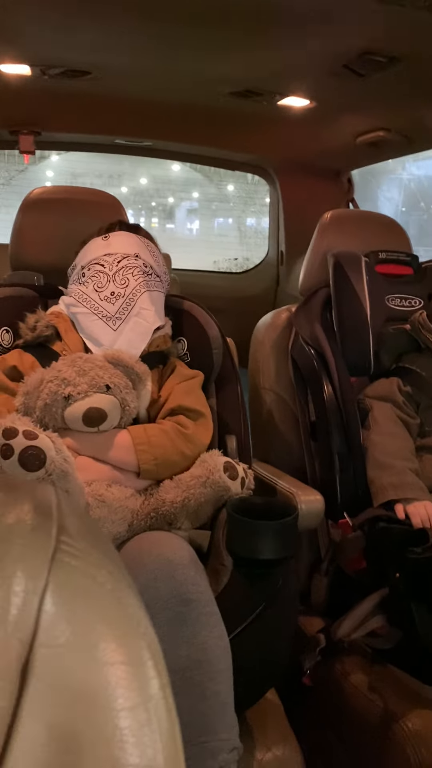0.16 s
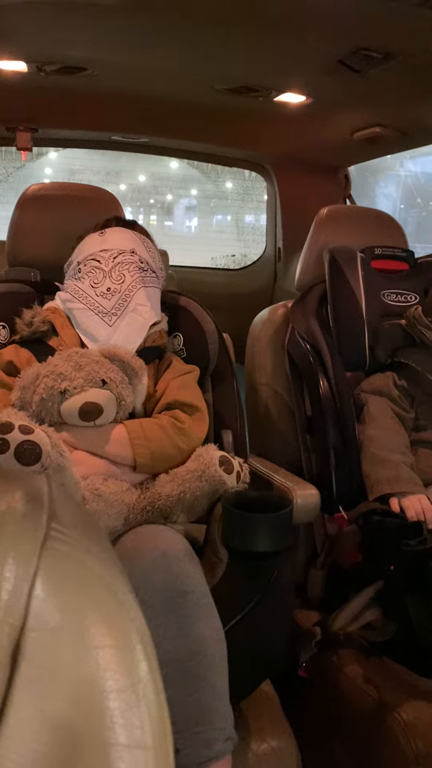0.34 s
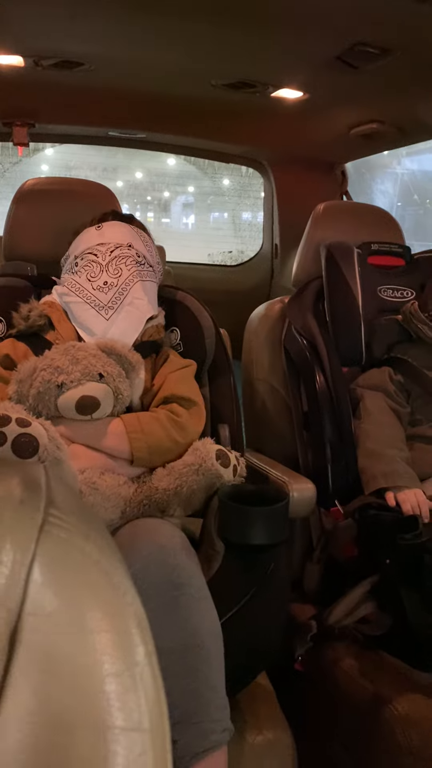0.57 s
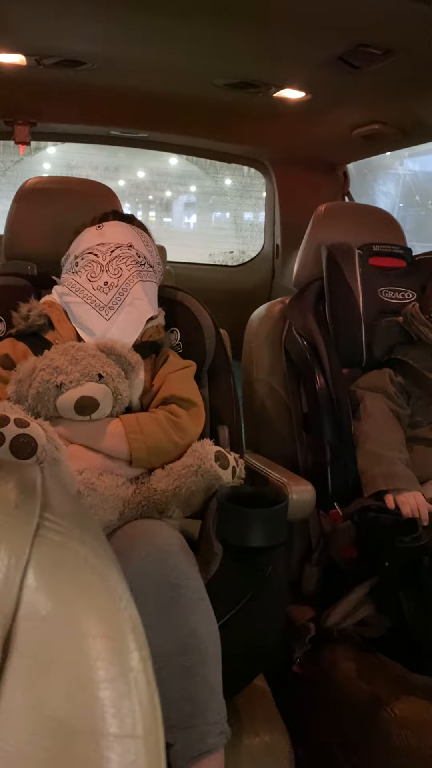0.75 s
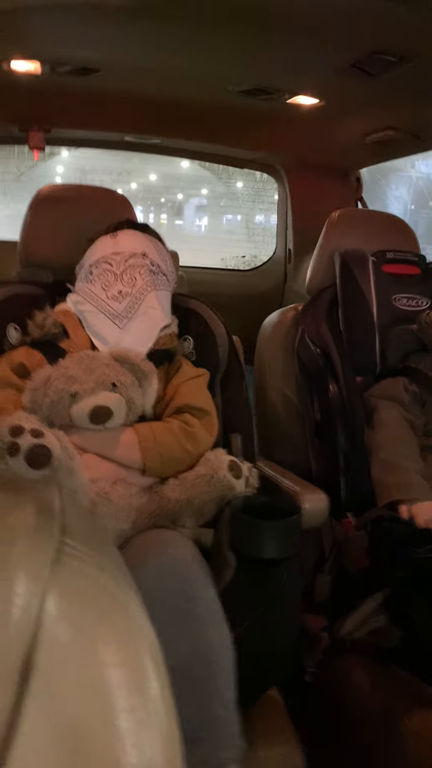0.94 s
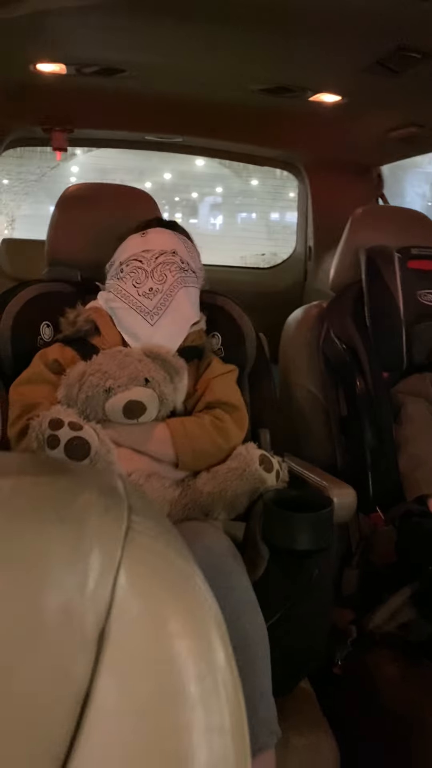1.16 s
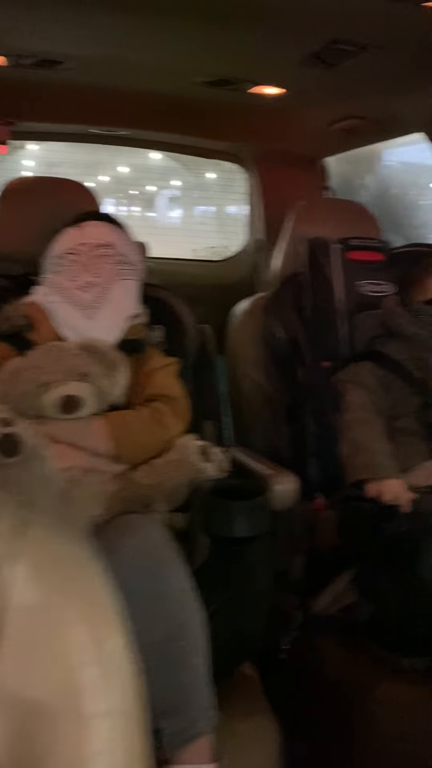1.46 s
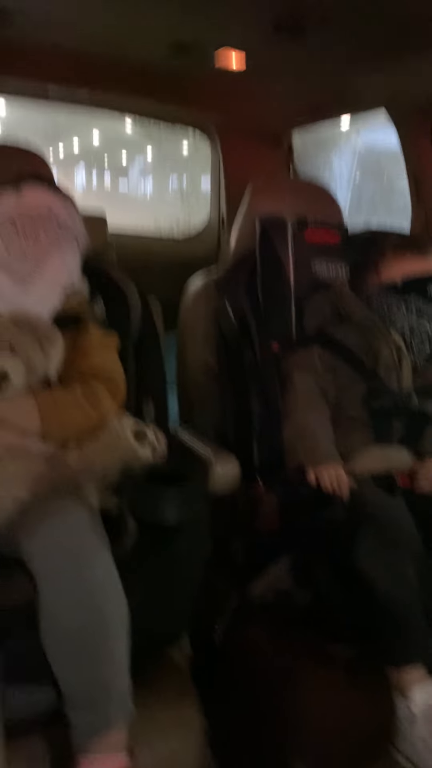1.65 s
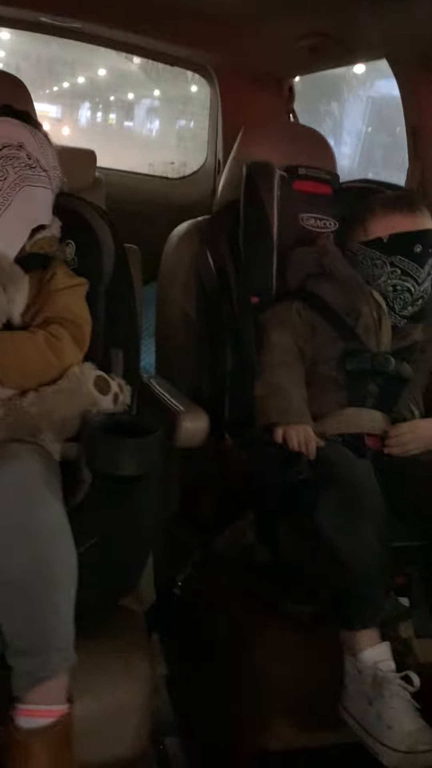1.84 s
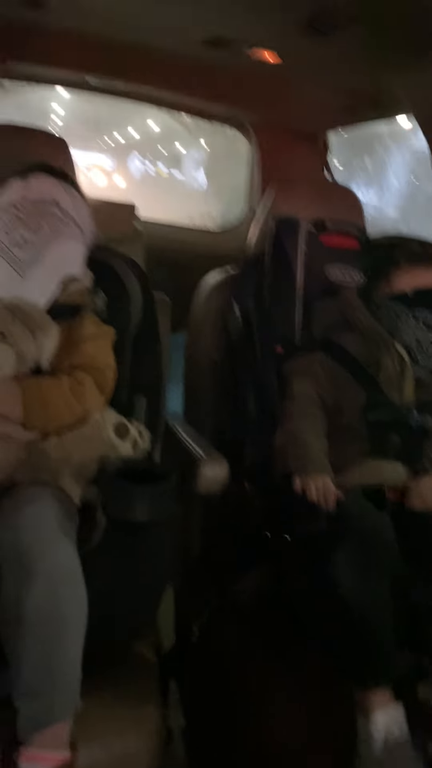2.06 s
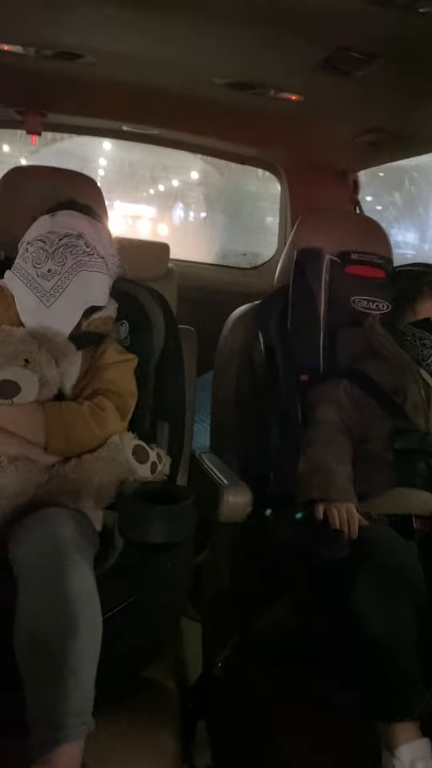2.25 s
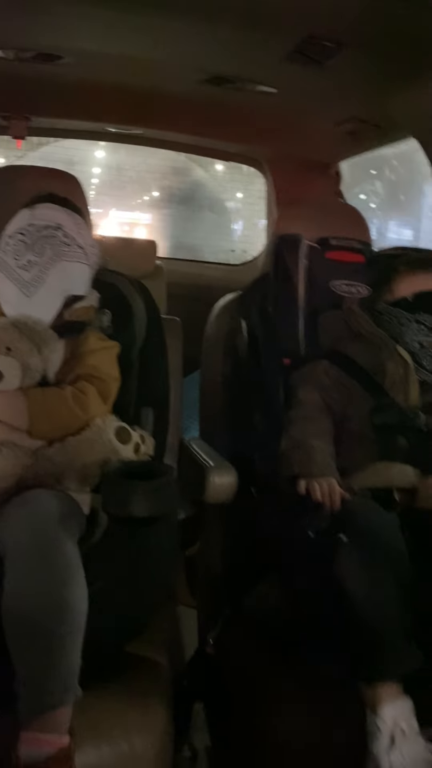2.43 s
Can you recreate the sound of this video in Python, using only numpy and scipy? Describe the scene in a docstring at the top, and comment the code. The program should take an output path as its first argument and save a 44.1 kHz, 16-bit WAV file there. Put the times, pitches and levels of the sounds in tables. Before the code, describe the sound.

A van door slams almost at once, with a metallic crunch, latch snap and deep cabin boom; low engine rumble continues, then a lighter hollow knock bounces and settles. Close stereo microphone inside the parked vehicle.

```python
"""Van door slam, engine idling

From the front seat of a parked van: the door seal meets the frame, the panel hits and the latch snaps.
Contacts are sharp clicks with decaying noise and ringing modes; soft pushes make the cabin air boom.
Later a lighter knock on the trim bounces and settles, among low thuds, ticks, sliding cloth and a squeak.
Engine tones, rumble and hiss lie beneath, with outside noise until the door seals.
A microphone with two ports that differ in phase picks it all up."""
import sys
import numpy as np
from scipy import signal
from scipy.fft import rfft, irfft
from scipy.io import wavfile
from scipy.ndimage import uniform_filter1d, minimum_filter1d

SR = 44100
rng = np.random.default_rng(int(sys.argv[2]) if len(sys.argv) > 2 else 0)


def transcribe(u):
    """Save the signal u as a 16-bit wav file named by the first command-line argument.

    u: samples, shape (n,) or (channels, n), limited to [-1, 1]; the rate is SR.
    q: integer samples, one column per channel.
    """
    v = np.clip(np.atleast_2d(u).T, -1, 1)
    q = np.round(v * 32767).astype(np.int16)
    wavfile.write(sys.argv[1], SR, q)


N = 114660
TIME = np.arange(N) / SR
LOW_CUT_HZ = 32.8  # for the cabin boom and the rumble

# Door meets frame [t/s, level/dB, attack/s]
DOOR_CONTACTS = [(.230, -19.5, 0.0054), (.239, -11.5, .002), (.246, -11.5, 0.0011), (.250, -16.5, 0.00089),
                 (.301, -21, 0.0016)]
# Panel noise colour [f/Hz, level per Hz/dB] and decay [f/Hz, t60/s]
DOOR_SPECTRUM = [(30, -49), (80, 12), (150, 4.5), (300, -3), (450, 0.5), (700, -4), (1100, -13),
                 (2200, -16), (5000, -29.5), (9000, -40), (16000, -47.5)]
DOOR_DECAY = [(100, 0.4), (250, 0.38), (700, 0.19), (2000, 0.2), (6000, .24), (14000, 0.37)]
# Sheet metal modes [f/Hz, level/dB, t60/s]
PANEL_MODES = [(187, -17.5, 0.24), (322.5, -14, 0.36), (441.6, -9, 0.28), (462, -22.5, 0.24),
               (596, -13.5, .16), (669, -18.5, .12), (787, -18, 0.087)]
# Short, hard crunch as the door bottoms out [t/s, level/dB, attack/s]
CRUNCH_CONTACTS = [(.2415, -16, 0.001965), (.2465, -9, 0.002976)]
# Crunch colour [f/Hz, level per Hz/dB] and decay [f/Hz, t60/s]
CRUNCH_SPECTRUM = [(330, -30.5), (590, 0), (950, -4.5), (1500, -9.5), (2700, -15.5), (12000, -56.5)]
CRUNCH_DECAY = [(600, 0.02), (2500, .035)]
# Latch parts striking [t/s, level/dB, attack/s, pitch f/Hz]
LATCH_CONTACTS = [(.240, -29, 0.0013, 2430), (.246, -22, 0.00086, 1660), (.2735, -19, .001, 5470),
                  (.277, -19.5, .001, 3390), (.2805, -18.5, 0.0012, 4120), (.2835, -17, .001, 2107),
                  (.343, -39.5, .002, 2390)]
# Latch colour [f/Hz, level per Hz/dB] and decay [f/Hz, t60/s]
LATCH_SPECTRUM = [(500, -16.5), (1300, -12), (2200, 3.5), (3800, -0.5), (6000, -12.5), (10000, -13.5),
                  (16000, -24)]
LATCH_DECAY = [(1000, 0.065), (4000, 0.047), (14000, 0.02)]
# Latch steel modes [f/Hz, level/dB, t60/s]
STEEL_MODES = [(1626, -20.5, .1), (2250, -20, .11), (2303, -17.5, 0.13), (2500, -15.5, .1),
               (2540, -15.5, 0.064), (4860, -18, .11)]
# The lock settles with a thin click [t/s, level/dB, attack/s]
LOCK_CONTACTS = [(.3755, -41.5, 0.0023), (.379, -47, 0.0042)]
# Lock colour [f/Hz, level per Hz/dB] and decay [f/Hz, t60/s]
LOCK_SPECTRUM = [(800, 1), (5000, -6.5), (9500, -4.5), (16000, -9)]
LOCK_DECAY = [(2000, 0.043), (12000, 0.049)]
# Left minus right for panel and crunch [f/Hz, level/dB]
DOOR_LEAN = [(330, 2), (700, -5.5), (1300, -3), (2400, -1)]


def door():
    """Contacts ring the sheet metal panel, crunch on the frame, and strike the latch and lock."""
    panel = struck(DOOR_CONTACTS, DOOR_SPECTRUM, DOOR_DECAY, crack=6)
    panel = panel + ring(force_of(DOOR_CONTACTS), PANEL_MODES)
    crunch = struck(CRUNCH_CONTACTS, CRUNCH_SPECTRUM, CRUNCH_DECAY, crack=10)
    latch = struck(LATCH_CONTACTS, LATCH_SPECTRUM, LATCH_DECAY, crack=2.8)
    latch = latch + ring(force_of(LATCH_CONTACTS), STEEL_MODES)
    latch = latch + pinged(LATCH_CONTACTS, ring_db=-2.5, t60=.035)
    lock = struck(LOCK_CONTACTS, LOCK_SPECTRUM, LOCK_DECAY, crack=3)
    return placed(panel + crunch, DOOR_LEAN) + latch + lock


# Pushes of the door on the cabin air [t/s, level/dB of the whole push, length/s]
AIR_PUSHES = [(0.2269, -16, 0.0055), (.2424, -12, 0.0039), (0.2574, -7.5, 0.0035), (.2755, -1.5, 0.011),
              (0.288, -2.5, 0.015), (0.3464, -9, 0.009), (0.428, -17, 0.012)]
# Cabin air modes [f/Hz, level/dB, t60/s]
AIR_MODES = [(40.95, -11.5, 1.56), (54.6, -3, .33), (69.8, -2.5, 0.26), (95.05, 2, .39), (106.94, -0.7, .5),
             (113.9, -0.5, 0.51), (152.8, -12.5, .39)]


def boom():
    """Soft pushes of the door set the enclosed air ringing in its low modes."""
    force = 0
    for start, db, length in AIR_PUSHES:
        push = np.sin(np.pi * np.clip((TIME - start) / length, 0, 1)) ** 2
        force = force + from_db(db) * push / push.sum()
    return low_cut(ring(force + 1e-18, AIR_MODES))


# Knock on the trim and its bounces [t/s, level/dB, attack/s]
KNOCK_CONTACTS = [(1.670, -44, 0.0016), (1.6818, -20, 0.00034), (1.6985, -32.5, .002), (1.779, -42, 0.0016),
                  (1.791, -45.5, 0.00117), (1.860, -49, .0012), (2.413, -57.5, 0.00074)]
# Knock colour [f/Hz, level per Hz/dB] and decay [f/Hz, t60/s]
KNOCK_SPECTRUM = [(40, -27), (100, 15), (220, 7), (450, -4), (850, 5.5), (1550, 1.5), (2600, -19.5),
                  (5000, -22), (10000, -28.5), (16000, -20)]
KNOCK_DECAY = [(120, 0.082), (400, 0.12), (1200, 0.013), (3000, .045), (10000, 0.094)]
# Trim modes [f/Hz, level/dB, t60/s]
TRIM_MODES = [(106, -12, 0.073), (220, -2, 0.075), (471.6, -12.5, 0.13), (772, -10, 0.078),
              (995, -21, 0.047), (1522, -19, 0.044)]
# Left minus right [f/Hz, level/dB]
KNOCK_LEAN = [(130, 0.3), (600, 3), (1300, 2), (2400, 0.27)]


def knock():
    """A hard tap and its bounces excite the short modes of hollow trim."""
    tap = struck(KNOCK_CONTACTS, KNOCK_SPECTRUM, KNOCK_DECAY, crack=9.4)
    trim = ring(force_of(KNOCK_CONTACTS), TRIM_MODES)
    return placed(tap + trim, KNOCK_LEAN)


# Dull low thuds, some after the slam, some under the knock [t/s, level/dB, attack/s]
THUD_CONTACTS = [(.425, -31.5, 0.00066), (.505, -36.5, 0.00067), (.875, -37, 0.0017),
                 (.920, -38.5, 0.00065), (1.686, -21, 0.0014), (1.7045, -21.5, 0.0005),
                 (1.786, -30.5, 0.0017), (1.799, -34.5, 0.0012)]
# Thud colour [f/Hz, level per Hz/dB] and decay [f/Hz, t60/s]
THUD_SPECTRUM = [(20, -41.5), (100, 14), (250, 5), (520, 1.5), (1000, -25.5), (4000, -37), (12000, -48)]
THUD_DECAY = [(150, 0.065), (2000, .04)]
# Low modes that the thuds ring [f/Hz, level/dB, t60/s]
THUD_MODES = [(116.5, 1.5, 0.064), (215, -1, 0.06)]


def thuds():
    """Dull low contacts, some after the slam and some under the knock, ring two low modes."""
    blows = struck(THUD_CONTACTS, THUD_SPECTRUM, THUD_DECAY, crack=8.4)
    return blows + ring(force_of(THUD_CONTACTS), THUD_MODES)


# Small plastic ticks [t/s, level/dB, attack/s, pitch f/Hz]
TICK_CONTACTS = [(.125, -48.5, 0.0028, 2410), (1.780, -51, .001, 2620), (1.861, -56.5, 0.00097, 2700),
                 (2.110, -53.5, 0.0018, 3450), (2.149, -53, .002, 2810), (2.293, -48, .002, 1333),
                 (2.298, -48, 0.0011, 4230), (2.320, -49.5, .002, 2430)]
# Tick colour [f/Hz, level per Hz/dB] and decay [f/Hz, t60/s]
TICK_SPECTRUM = [(300, 14), (1200, -2), (2500, -1.5), (4500, -2.5), (8000, -15.5), (16000, -18.5)]
TICK_DECAY = [(500, 0.13), (2500, 0.08), (8000, 0.058)]


def ticks():
    """Small plastic contacts click, and each rings its own pitch."""
    taps = struck(TICK_CONTACTS, TICK_SPECTRUM, TICK_DECAY, crack=9.6)
    return taps + pinged(TICK_CONTACTS, ring_db=-3, t60=0.06)


# Cloth sliding on upholstery [centre t/s, level/dB, half length/s, centre f/Hz]
CLOTH_RUBS = [(0.787, -63.5, 0.033, 4060)]
RUB_WIDTH_HZ = 820


def cloth():
    """Friction of cloth as a narrow band of stereo noise that swells and fades."""
    out = 0
    for centre, db, half_length, hz in CLOTH_RUBS:
        peak = signal.iirpeak(hz, hz / RUB_WIDTH_HZ, fs=SR)
        rub = signal.lfilter(*peak, rng.standard_normal((2, N)))
        swell = np.exp(-((TIME - centre) / half_length) ** 2 / 2)
        out = out + from_db(db) * swell * rub / rub.std()
    return out


# Faint squeak of a seat cover [t/s, level/dB, pitch f/Hz]
SEAT_SQUEAK = [(1.931, -85, 4620), (1.945, -64, 4500), (1.975, -82, 4670), (2.03, -72.5, 4720),
               (2.16, -71.5, 4500), (2.225, -65.5, 4230), (2.249, -77.5, 4100)]
SQUEAK_WIDTH_HZ, SQUEAK_CATCH_DB = 700, 0.5  # roughness of the tone, spread of its level
LOW_PARTIAL_RATIO, LOW_PARTIAL_DB = .63, -5


def squeak():
    """A thin, rough rubbing tone whose pitch wavers, then sinks, over a weaker lower partial."""
    times, db, hz = np.transpose(SEAT_SQUEAK)
    phase = 2 * np.pi * np.cumsum(np.interp(TIME, times, hz)) / SR

    def rough(angle):
        """A tone spread into a narrow band by random sine and cosine amplitudes."""
        return drift(SQUEAK_WIDTH_HZ) * np.sin(angle) + drift(SQUEAK_WIDTH_HZ) * np.cos(angle)

    level = from_db(np.interp(TIME, times, db) + SQUEAK_CATCH_DB * drift(70))
    low_partial = from_db(LOW_PARTIAL_DB) * rough(LOW_PARTIAL_RATIO * phase)
    return level * (rough(phase) + low_partial)


# Idling engine tones [f/Hz, mean rms level/dB]
ENGINE_TONES = [(37.7, -39), (107.7, -40.5), (140, -50.5), (285.3, -67.5)]
ENGINE_WAVER_DB, ENGINE_WAVER_RAD = 1.5, 1  # spread of level and of phase


def engine():
    """Low engine tones, each wavering slowly in level and phase."""
    out = 0
    for hz, db in ENGINE_TONES:
        level = from_db(db + ENGINE_WAVER_DB * drift(6))
        phase = 2 * np.pi * hz * TIME + ENGINE_WAVER_RAD * drift(2)
        out = out + level * np.sqrt(2) * np.sin(phase)
    return out


# Rumble colour [f/Hz, level per Hz/dB]
RUMBLE_SPECTRUM = [(26, -30.5), (40, 4), (60, 7), (100, -1.5), (150, -7), (250, -19), (500, -30),
                   (1000, -47.5), (3000, -66.5)]
RUMBLE_DB = -35.5  # before the low cut


def rumble():
    """Steady low noise under the engine tones, with the deepest bass cut."""
    return low_cut(coloured(RUMBLE_SPECTRUM, lambda hz: from_db(RUMBLE_DB)))


# Faint background hiss: colour [f/Hz, level per Hz/dB] and course,
# with a short surge near 1.74 s [t/s, level/dB]
HISS_SPECTRUM = [(400, 8), (1200, -1), (2500, -2.5), (5000, -15), (8000, -23.5), (16000, -40.5)]
HISS_COURSE = [(0, -60), (.45, -59.5), (.66, -66), (.8, -57), (.94, -63.5), (1.1, -59), (1.4, -62.5),
               (1.64, -58), (1.74, -47.5), (1.82, -58.5), (2.12, -58), (2.26, -65), (2.58, -59)]
# Thin top hiss: colour [f/Hz, level per Hz/dB] and course [t/s, level/dB]
TOP_SPECTRUM = [(2000, -16.5), (5000, 2.5), (10000, -2), (16000, -4.5)]
TOP_COURSE = [(0, -83), (.6, -84), (.8, -66.5), (.94, -75), (1.05, -70), (1.64, -70), (1.74, -56),
              (1.83, -79), (1.95, -70), (2.3, -90), (2.5, -79)]


def hiss():
    """Two layers of faint noise, each rising and falling along its own course."""
    body = from_db(np.interp(TIME, *np.transpose(HISS_COURSE)))
    top = from_db(np.interp(TIME, *np.transpose(TOP_COURSE)))
    return coloured(HISS_SPECTRUM, lambda hz: body) + coloured(TOP_SPECTRUM, lambda hz: top)


# Outside noise colour [f/Hz, level per Hz/dB]
OUTSIDE_SPECTRUM = [(25, -1), (50, 29), (150, 14.5), (300, -0.5), (700, -4.5), (1300, -11), (2600, -13.5),
                    (5000, -28), (10000, -37.5)]
OUTSIDE_DB, SEALED_S, SEALING_S = -33, 0.33, 0.046  # level, moment of sealing, fade before it


def outside():
    """Distant noise comes in through the open door and fades out as it seals."""
    level = from_db(OUTSIDE_DB) * np.clip((SEALED_S - TIME) / SEALING_S, 0, 1)
    return coloured(OUTSIDE_SPECTRUM, lambda hz: level)


def struck(hits, colour, t60s, crack):
    """Each contact clicks, and its diffuse ring dies away band by band in the cabin."""
    feed = 0  # power fed in during each attack
    for start, db, attack, *_ in hits:
        rise = np.clip((TIME - start) / attack, 0, 1)
        feed = feed + from_db(db) ** 2 * np.diff(rise, prepend=0)

    def envelope(hz):
        """Amplitude of a band whose power leaks away at its own t60."""
        keep = from_db(-120 / (at_hz(t60s, hz) * SR))  # 120, as this is power
        return np.sqrt(signal.lfilter([1], [1, -keep], feed + 1e-20))

    return coloured(colour, envelope) + crack * snap(force_of(hits), colour)


def snap(force, colour):
    """The compact, causal click of each contact, with the given spectrum and unit energy."""
    size = 8192
    magnitude = from_db(at_hz(colour, np.fft.rfftfreq(size, 1 / SR) + 1))
    # folding the cepstrum forward in time gives minimum phase
    cepstrum = irfft(np.log(magnitude))
    cepstrum[1:size // 2] *= 2
    cepstrum[size // 2 + 1:] = 0
    click = irfft(np.exp(rfft(cepstrum)))
    return signal.fftconvolve(force, click / np.linalg.norm(click))[:N]


def pinged(hits, ring_db, t60):
    """Each contact also rings the small part that it strikes, at that part's own pitch."""
    return sum(ring(force_of([hit]), [(hit[-1], ring_db, t60)]) for hit in hits)


def ring(force, modes):
    """Decaying sines set ringing by a force, one two-pole resonator per mode."""
    out = 0
    for hz, db, t60 in modes:
        radius = from_db(-60 / (t60 * SR))
        w = 2 * np.pi * hz / SR
        poles = [1, -2 * radius * np.cos(w), radius * radius]
        out = out + from_db(db) * signal.lfilter([0, np.sin(w)], poles, force)
    return out


def force_of(hits):
    """The contacts as impulses, each at the end of its attack."""
    start, db, attack = np.transpose(hits)[:3]
    return clicks(start + attack, from_db(db))


def clicks(times, gains):
    """One impulse per event, over a tiny offset that keeps the filters fast."""
    out = np.zeros(N)
    np.add.at(out, (np.asarray(times) * SR).astype(int), gains)
    return out + 1e-18


# Stereo spread, side against mid [f/Hz, level/dB]
SIDE_LEVEL = [(40, -47), (120, -35.5), (250, -16), (600, -6), (2000, -4.5), (5000, -6.5), (12000, -68.5)]


def coloured(colour, envelope):
    """Half-octave noise bands, mid power scaled to about 1, each under envelope(hz)."""
    edges = 22 * 2 ** np.arange(0, 9.9, .5)
    centres = np.sqrt(edges[1:] * edges[:-1])
    gains = from_db(at_hz(colour, centres))
    gains = gains / np.sqrt(np.sum(gains ** 2 * np.diff(edges)) * 2 / SR)
    white = rng.standard_normal((2, 2, N))
    out = 0
    for k, hz in enumerate(centres):
        mid, side = white[k % 2]  # neighbouring bands use different noise
        noise = mid + from_db(at_hz(SIDE_LEVEL, hz)) * side * [[1], [-1]]
        band = signal.butter(2, edges[k:k + 2], "band", fs=SR, output="sos")
        out = out + gains[k] * signal.sosfilt(band, noise * envelope(hz) + 1e-18)
    return out


def placed(x, balance):
    """Lean a sound left or right, frequency by frequency."""
    db = at_hz(balance, np.fft.rfftfreq(N, 1 / SR) + 1)
    return irfft(rfft(x) * from_db(np.array([db, -db]) / 2), N)


def low_cut(x):
    """Take away what lies below the deepest bass."""
    return signal.sosfilt(signal.butter(4, LOW_CUT_HZ, "high", fs=SR, output="sos"), x)


def drift(rate):
    """Smooth random wander of spread about 1, from `rate` random points a second."""
    return signal.resample(rng.standard_normal(int(rate * N / SR) + 2), N)


def at_hz(points, hz):
    """Read a table on a log-frequency axis."""
    f, v = np.transpose(points)
    return np.interp(np.log(hz), np.log(f), v)


def from_db(db):
    """Decibels to gain."""
    return 10 ** (np.asarray(db) / 20)


def scene():
    """Everything heard from the front seat."""
    slam = door() + boom()
    small_sounds = thuds() + ticks() + cloth() + squeak()
    background = engine() + rumble() + hiss() + outside()
    return slam + knock() + small_sounds + background


# Phase lead of the left microphone port over the right [f/Hz, lead/rad]
PORT_LEAD = [(0, 0), (2400, .4), (5300, .9), (6500, 2.1), (7400, 3.14), (8600, 4.7), (10300, 6.28),
             (12200, 7.9), (13600, 9.42), (15800, 12.3)]
LIMIT, LIMIT_HOLD_S = 1, 0.0033  # full scale, and the span of the gain dips
TOP_CUT_HZ = 15850


def record(dry):
    """The two microphone ports differ in phase, a limiter holds down peaks, the top is cut."""
    lead = np.interp(np.fft.rfftfreq(N, 1 / SR), *np.transpose(PORT_LEAD))
    out = irfft(rfft(dry) * np.exp(.5j * np.array([lead, -lead])), N)
    hold = int(LIMIT_HOLD_S * SR)
    # one gain for both channels: hold the lowest value, then smooth it
    gain = np.minimum(1, LIMIT / (np.abs(out).max(axis=0) + 1e-9))
    out = out * uniform_filter1d(minimum_filter1d(gain, hold), hold)
    return signal.sosfilt(signal.ellip(10, .2, 80, TOP_CUT_HZ, fs=SR, output="sos"), out)


dry = scene()
out = record(dry)
transcribe(out)
```